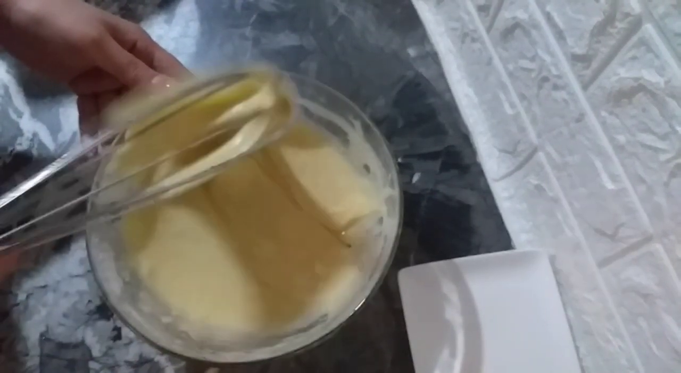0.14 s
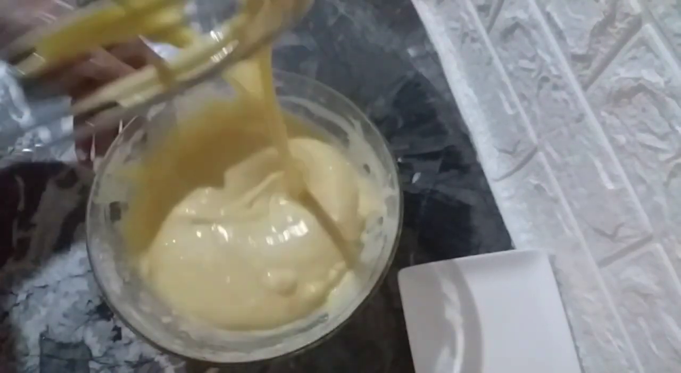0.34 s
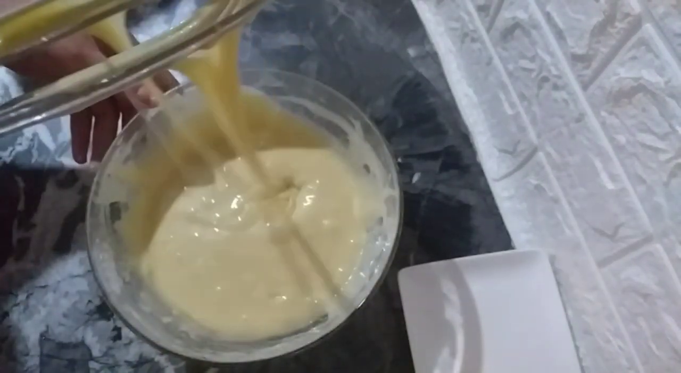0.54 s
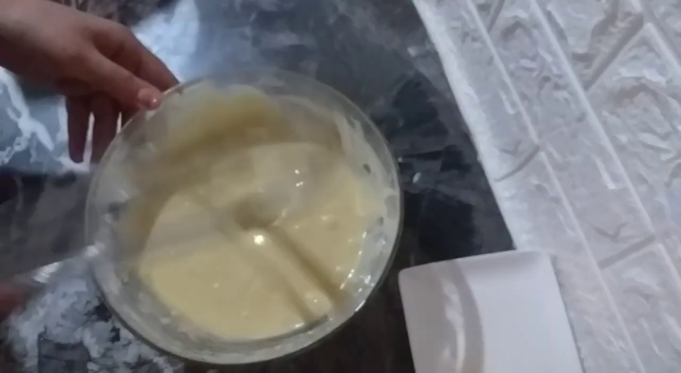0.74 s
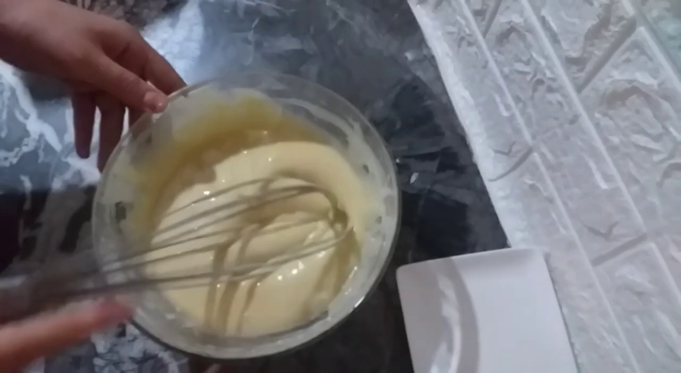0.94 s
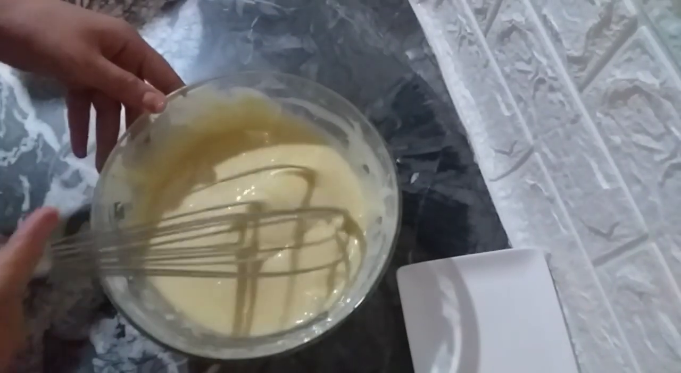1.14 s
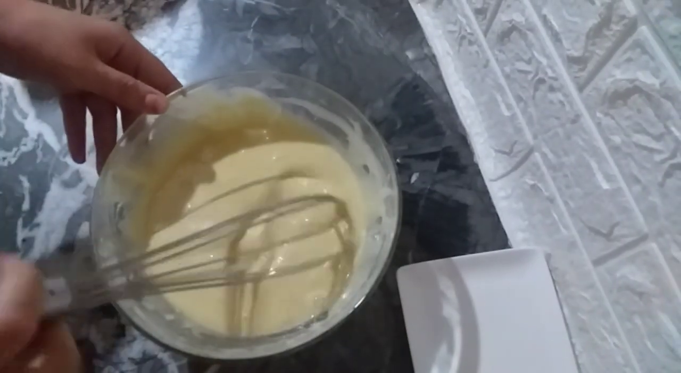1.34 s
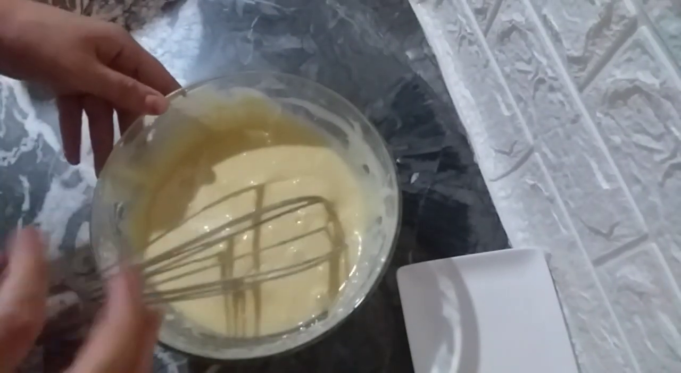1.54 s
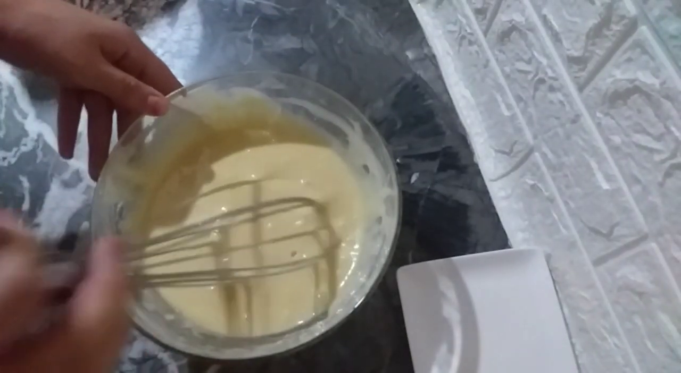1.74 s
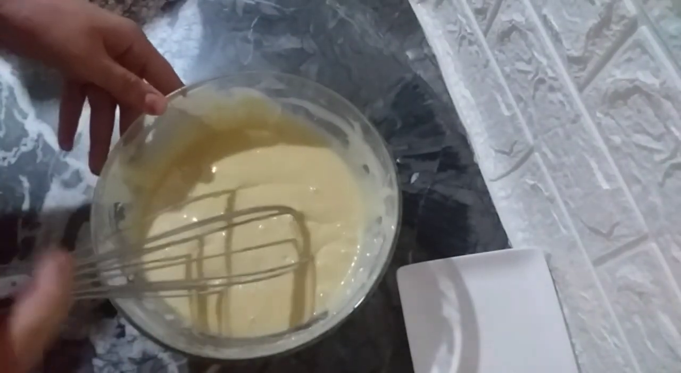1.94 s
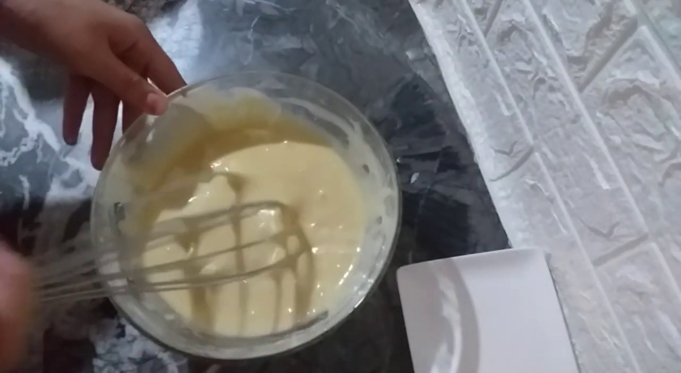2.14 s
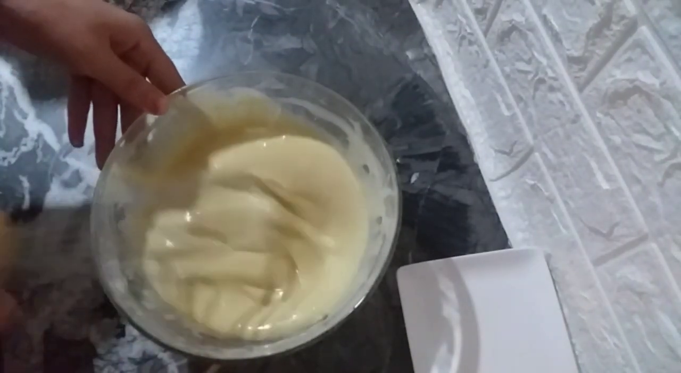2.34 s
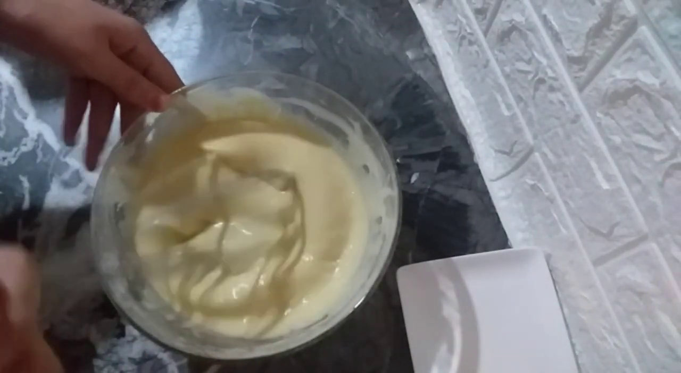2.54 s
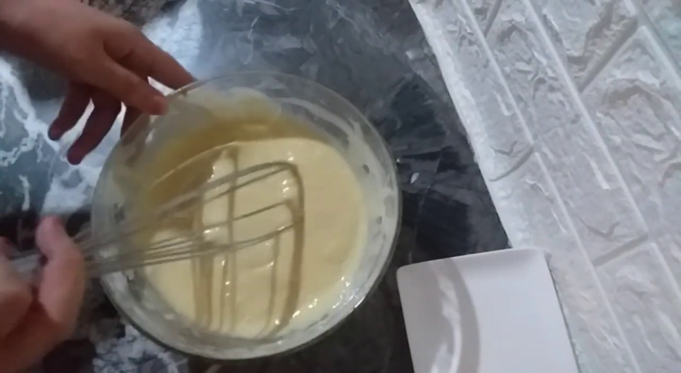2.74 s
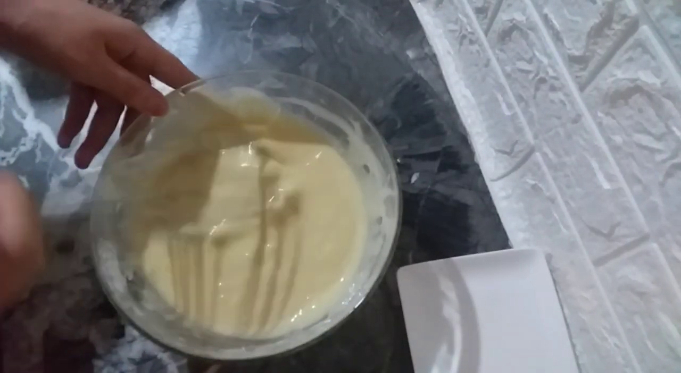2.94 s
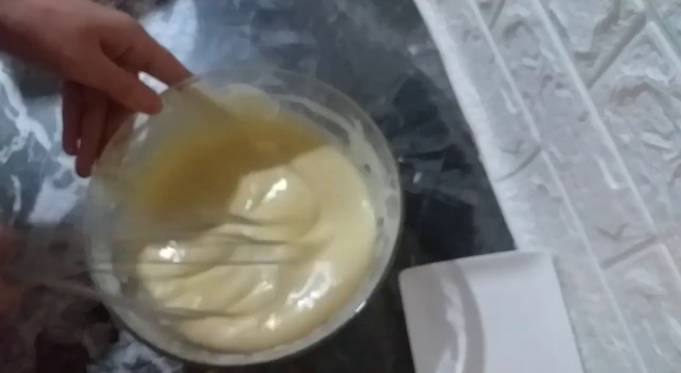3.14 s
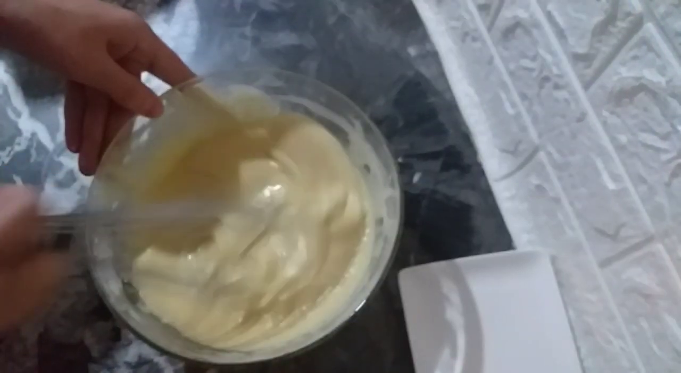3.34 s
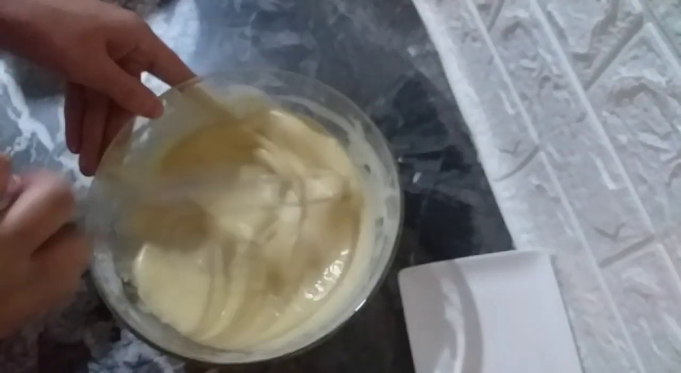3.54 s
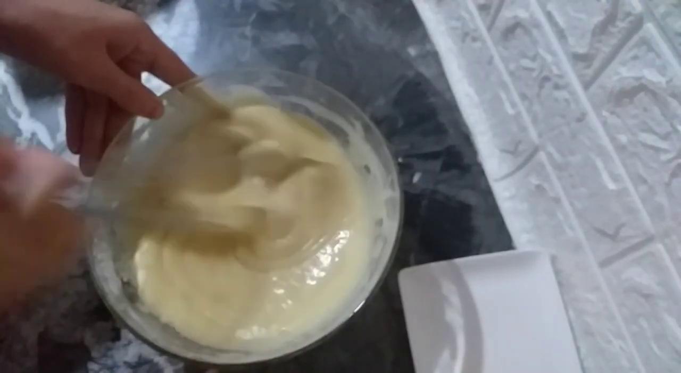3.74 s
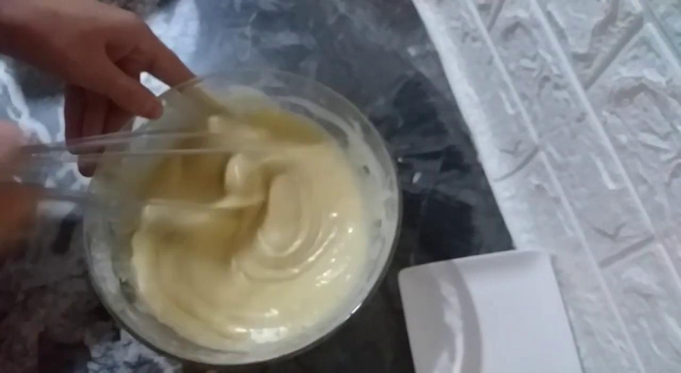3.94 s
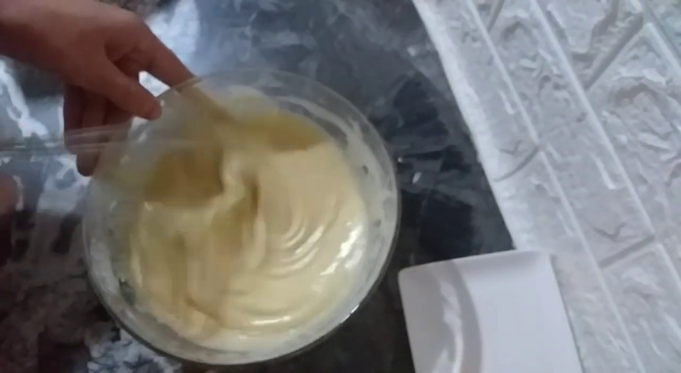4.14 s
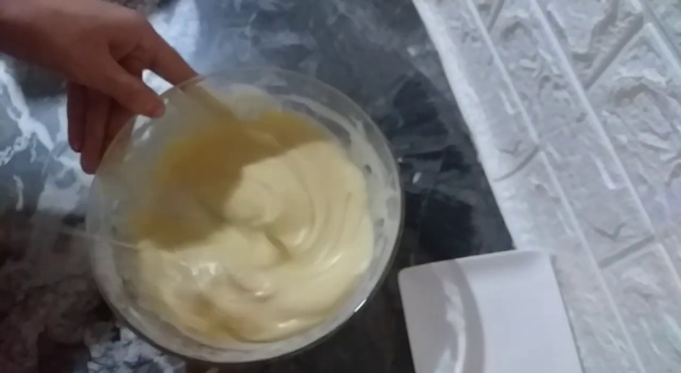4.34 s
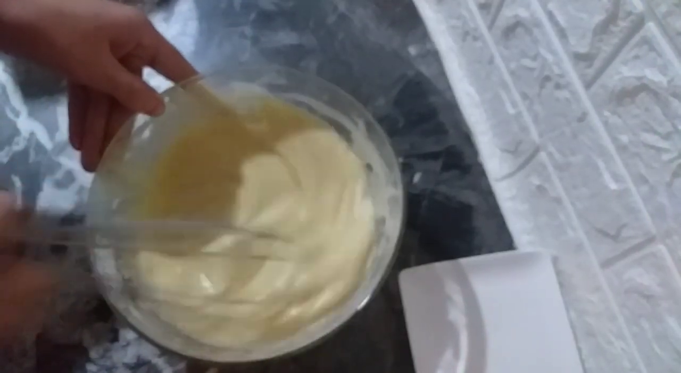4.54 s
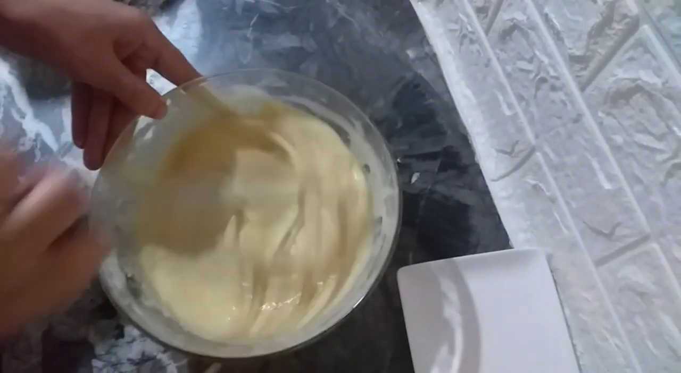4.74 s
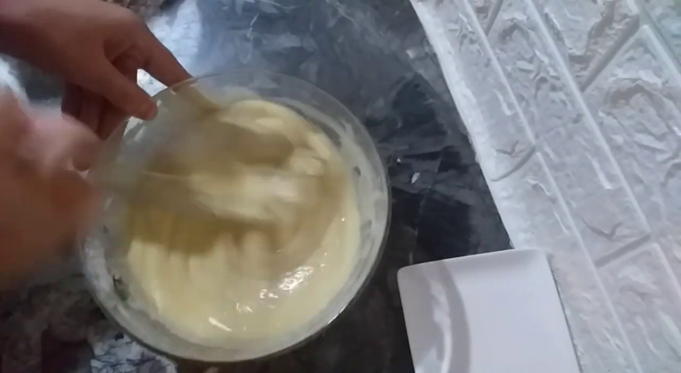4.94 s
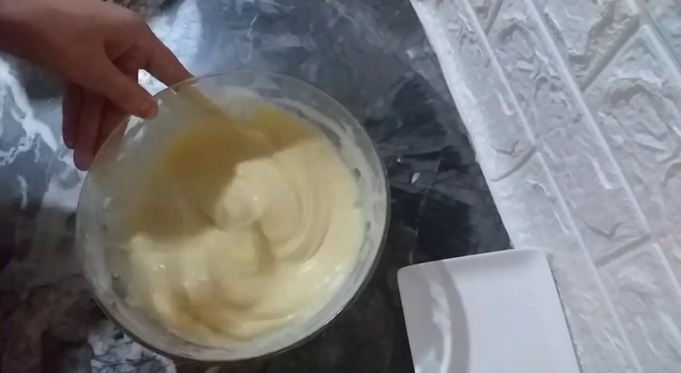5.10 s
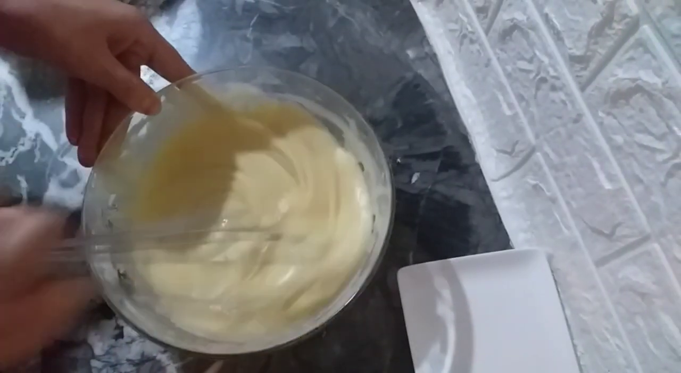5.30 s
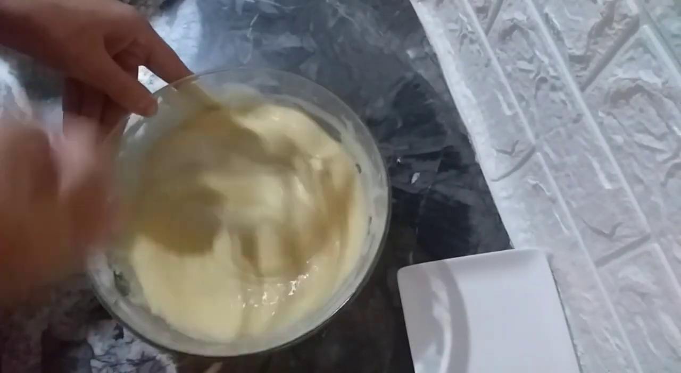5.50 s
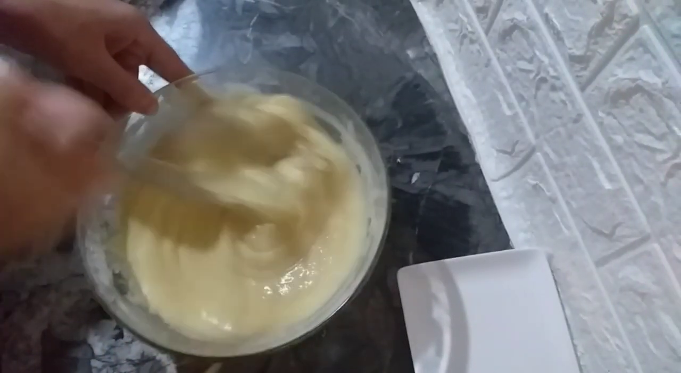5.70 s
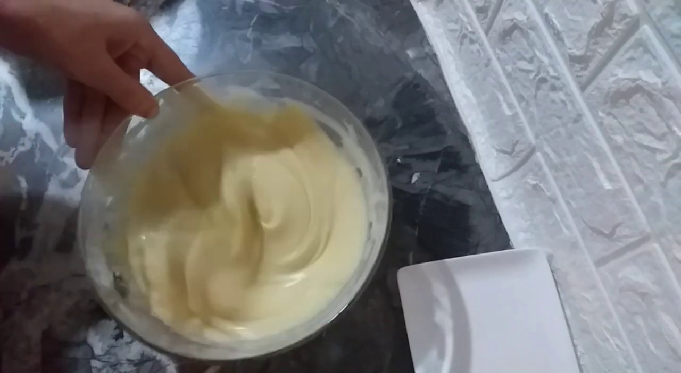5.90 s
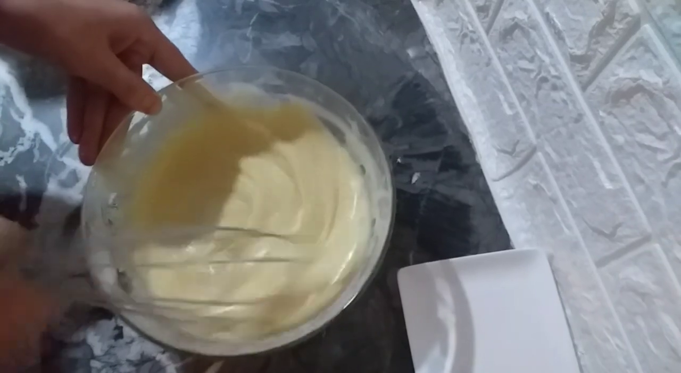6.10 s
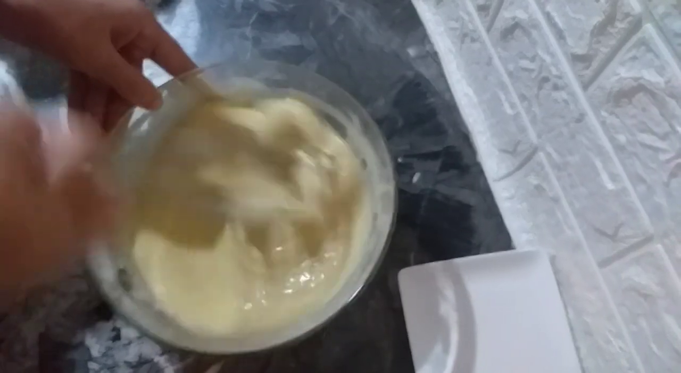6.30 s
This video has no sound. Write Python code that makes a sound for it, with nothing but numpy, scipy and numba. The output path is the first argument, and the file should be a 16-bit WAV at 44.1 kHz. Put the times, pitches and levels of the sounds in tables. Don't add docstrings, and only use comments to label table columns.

```python
import sys
import numpy as np
from scipy import signal
from scipy.fft import rfft, irfft
from scipy.io import wavfile
from scipy.ndimage import uniform_filter1d
from numba import njit

SR = 44100
rng = np.random.default_rng(int(sys.argv[2]) if len(sys.argv) > 2 else 0)


def undo_db(level):
    steps = np.asarray(level, float) / 20
    return 10 ** steps


def wrap_up_sound(samples):
    columns = np.atleast_2d(samples).T
    tamed = np.clip(columns, -1, 1)
    steps = np.round(tamed * 32767).astype(np.int16)
    wavfile.write(sys.argv[1], SR, steps)


N = 280476

# start_s, level_db
HUM_SWELL = [(0, -54.5), (1.0, -56.5), (1.2, -48), (2.4, -48), (6.36, -47)]
# start_s, level_db
TAPS = [
    (2.3, -20),
    (2.531, -17),
    (3.027, -40),
    (3.283, -39),
]
# start_s, peak_db, wire_ring_hz, dull_knock_db, flurry_ms
STRIKES = [(2.3001, -9.5, 6570, -21, 1.9), (2.3068, -16.5, 7850, -13, 14.5),
           (2.531, -2.5, 7670, -17.5, 1.55), (3.3974, -29, 4200, -8, 27), (3.8685, -15, 7200, -13.5, 4.7),
           (4.131, -14, 6400, -10, 4.7), (4.3334, -15.5, 5600, -29, 7), (4.376, -16, 7440, -9.5, 2.9),
           (4.58, -15.5, 5300, -20, 3.8), (4.6257, -14.5, 7400, -15, 7.4), (4.88, -16, 7050, -16.5, 5.8),
           (5.1349, -13.5, 7630, -15, 6.1), (5.1739, -17.5, 8000, -11, 3.5), (5.367, -15.5, 7700, -25, 8.8),
           (5.4034, -12, 7560, -15.5, 6.5), (5.453, -17.5, 7700, -9, 5.6), (5.5394, -19.5, 8000, -9.5, 3.4),
           (5.674, -5.5, 7700, -22.5, 5), (5.7095, -15.5, 7900, -10.5, 5.6),
           (5.7981, -18.5, 7640, -9.5, 7.8), (5.9047, -12.5, 5540, -18, 3.5),
           (6.072, -12.5, 8000, -11.5, 2.6), (6.2133, -21, 8200, -12.5, 18),
           (6.253, -11.5, 7700, -10.5, 4.4)]
# pitch_hz, level_db, t60_s
GLASS = [(1363, -1, 0.03), (2099, 4, 0.048), (3052, 7, 0.062), (4140, 6.5, 0.044), (5504, 11.5, 0.052),
         (6040, -3, 0.04), (7680, 6.5, 0.048), (7030, 2, 0.04), (3820, -1, 0.042), (8600, 10, 0.047),
         (15300, 3, 0.024), (11840, 10, 0.019), (12250, 5, 0.04), (14370, -1, 0.03)]


def unit(x):
    return x / np.sqrt(np.mean(x ** 2))


def curves(table):
    s, *columns = np.transpose(table)
    return [np.interp(np.arange(N) / SR, s, c) for c in columns]


@njit
def svf(x, hz, width):
    y, b, l = np.empty(len(x)), 0., 0.
    for i in range(len(x)):
        centre = hz[i % len(hz)]
        g, k = np.tan(np.pi * centre / SR), width / centre
        v = (b + g * (x[i] - l)) / (1 + g * (g + k))
        b, l, y[i] = 2 * v - b, l + 2 * g * v, k * v
    return y


def band(x, hz, width):
    return svf(x + 1e-18, np.array([1. * hz]), 1. * width)


def narrow_noise(hz, width):
    return unit(band(band(rng.standard_normal(N), hz, width), hz, width))


def walk(rate):
    k = int(SR / rate)
    steps = np.repeat(rng.standard_normal(N // k + 1), k)
    return uniform_filter1d(uniform_filter1d(steps, k), k)[:N]


def add(out, s, x):
    i = int(s * SR)
    out[..., i:i + x.shape[-1]] += x[..., :max(N - i, 0)]


def fridge(wobble_db=1.4, wobble_hz=9):
    # pitch_hz, level_db
    hum = [
        (48.4, -59),
        (96.9, -50.5),
        (145.3, -75.5),
    ]
    # centre_hz, width_hz, level_db
    vent_bands = [(2475, 330, -68.5), (3450, 240, -72), (5000, 600, -65), (7700, 450, -71),
                  (13500, 4500, -80), (1940, 360, -78)]
    t, (swell_db,) = np.arange(N) / SR, curves(HUM_SWELL)
    tones = np.zeros(N)
    for k, (hz, db) in enumerate(hum):
        wobble = wobble_db * (k + 0.35) * narrow_noise(wobble_hz, wobble_hz)
        tones += undo_db(db + wobble) * np.sin(2 * np.pi * hz * t)
    vent = sum(undo_db(db) * unit(band(rng.standard_normal(N), hz, width)) for hz, width, db in vent_bands)
    drone = undo_db(-9) * narrow_noise(315, 25)
    return (unit(tones) + drone * undo_db(swell_db - swell_db[-1])) * undo_db(swell_db) + vent


def rustle(flicker_db=4.0, flicker_rate=18):
    edges_hz = [130, 700, 1550, 8500]
    # pitch_hz, level_db_per_hz
    rustle_colour = [(71, -37), (120, -10), (174, -13), (310, -6.5), (624, -17.5), (1160, -22), (1680, -26),
                     (3900, -31.5), (5100, -29.5), (15200, -43), (16500, -38)]
    # start_s, level_db
    movement = [(0, 12), (.04, 2), (.4, -6.5), (.5, 1), (.98, -3), (1.05, -2), (1.13, 4), (1.28, 3.5),
                (1.37, 5.5), (1.55, 3), (1.75, 0), (2.2, 1.1), (2.42, -0.5), (2.7, 1.5), (2.99, -3.5),
                (3.3, 4.5), (3.63, 4), (6.36, -2.5)]
    # rest_db, db_per_db_of_movement, db_per_db_of_phone_gain, beating_db
    layers = [
        (-54.5, 0.99, 1, -1),
        (-68.5, 2.5, 0.86, -6),
        (-59.5, 1.85, 1, -9),
        (-66.5, 0.84, 0.37, 5.5),
    ]
    # centre_s, half_length_s, added_air_db
    swishes = [
        (1.107, 0.068, 10),
        (1.37, 0.026, 13.5),
        (1.977, 0.023, 8),
    ]
    t = np.arange(N) / SR
    hz, colour = np.transpose(rustle_colour)
    region = np.zeros((4, N))
    for f in np.geomspace(131, 15300, 25):
        db = np.interp(np.log(f), np.log(hz), colour) + 10 * np.log10(f)
        flicker = flicker_db * walk(flicker_rate)
        region[np.searchsorted(edges_hz, f + 1) - 1] += undo_db(db + flicker) * narrow_noise(f, f / 3.4)
    region = [unit(r) for r in region]
    region[-1] *= undo_db(sum(db * np.exp(-((t - s) / half) ** 2) for s, half, db in swishes))
    (move_db,), (gain_db,) = curves(movement), curves(HUM_SWELL)
    beating = np.clip((t - 2.96) / 1, 0, 1)
    out = np.zeros(N)
    for (rest_db, per_move, per_gain, beating_db), r in zip(layers, region):
        db = rest_db + per_move * move_db + per_gain * (gain_db - gain_db[-1]) + beating_db * beating
        out += undo_db(db) * r
    return out


def thuds(spread=0.17, partner_db=-5, rise_s=0.0096, cycles=19):
    # start_s, peak_db,
    # pitch_hz
    bowl_thuds = [(2.44, -57, 310), (2.91, -56, 260), (2.765, -39, 300), (3.024, -34.5, 393),
                  (3.279, -34.5, 361), (3.482, -29.5, 310), (3.523, -31, 280), (3.573, -36, 369),
                  (3.733, -32.5, 323), (3.985, -29.5, 354), (4.186, -26.5, 320), (4.249, -28, 316),
                  (4.326, -35, 377), (4.437, -29, 296), (4.508, -27, 354), (4.668, -29.5, 316),
                  (4.753, -33, 380), (4.999, -30.5, 321), (5.179, -32.5, 318), (5.261, -31.5, 314),
                  (5.45, -35.5, 258), (5.538, -27, 390), (5.739, -33, 313), (5.8, -31.5, 344),
                  (5.939, -32.5, 262), (5.988, -31, 283), (6.037, -41, 266), (6.077, -26.5, 391),
                  (6.253, -34.5, 284), (6.301, -36.5, 247),
                  (0, -45, 129),
        (0, -63, 270),
                  (3.231, -38.5, 324), (4.144, -47, 258), (3.348, -59, 307), (3.657, -45, 220),
             (3.695, -35, 420), (3.758, -36, 228), (3.809, -36, 369), (3.928, -38, 273), (3.965, -36, 229),
             (4.012, -49, 416), (4.1, -40, 230), (4.363, -41.5, 213), (4.623, -37, 383), (4.778, -41, 331),
             (4.88, -48, 353), (4.944, -37.5, 241), (5.136, -42, 215), (5.208, -39, 244), (5.296, -47, 295),
             (5.371, -39, 377), (5.562, -39.5, 310), (6.1, -32, 424), (6.212, -35.5, 227),
             (6.344, -31, 388)]
    out, t = np.zeros(N), np.arange(8192) / SR
    rows = bowl_thuds
    rows += [(s, db - 29.5, 217.8) for s, db, *_ in STRIKES]
    rows += [(s, db - 6.5, 205) for s, db in TAPS[2:]]
    for (s, db, hz), c in zip(rows, rng.uniform(-0.97, 1, size=(len(rows), 4))):
        above_hz, below_hz = hz * (1.305 + spread * c[0]), hz * (0.737 + spread * c[2])
        wave = np.sin(2 * np.pi * hz * t)
        wave += undo_db(partner_db - 3.5) * np.sin(2 * np.pi * above_hz * t + np.pi * c[1])
        wave += undo_db(partner_db) * np.sin(2 * np.pi * below_hz * t + np.pi * c[3])
        add(out, s, undo_db(db + 11.5) * wave * (1 - np.exp(-t / rise_s)) * 1000 ** (-t * hz / cycles))
    return out


def contacts():
    # start_s, peak_db, wire_ring_hz, dull_knock_db
    bare = [(6.148, -44, 8800, -30), (2.4982, -40, 4340, -28), (3.0934, -39, 7060, -6),
            (3.1396, -38, 6760, -47), (3.5734, -33, 7700, -8), (3.7489, -28, 6750, -2.5),
            (4.0974, -27, 7050, -3.5), (4.1445, -22, 4120, -7), (5.008, -26.5, 7100, -8.5),
            (5.1973, -26.5, 7700, -4), (6.0828, -18.5, 8200, -19), (6.342, -22, 7700, -8),
            (6.352, -22.5, 7000, -6)]
    # start_s, peak_db, wire_ring_hz, dull_knock_db
    filmed = [(2.268, -41, 6400, -22), (3.1953, -31, 6650, -29), (3.3904, -22, 5500, -20),
              (3.5115, -29, 6700, 1.5), (3.7324, -33.5, 3770, 2.5), (3.8, -32, 7020, -5),
              (3.9161, -26.5, 6700, -6), (3.9619, -35.5, 5640, 5.5), (3.9832, -22.5, 6040, -8.5),
              (4.1826, -21.5, 8150, -7.5), (4.2094, -27.5, 7700, -22), (4.324, -37.5, 5500, -3),
              (4.4263, -18.5, 5500, -6), (4.4325, -21.5, 6700, -10), (5.228, -25, 6400, -12),
              (5.2674, -22.5, 7760, -5), (5.4869, -26.5, 6840, -12.5), (5.55, -24, 7800, -8),
              (5.7657, -25, 7700, -10), (5.9421, -17.5, 7440, -7.5), (5.9644, -26, 5860, -32),
              (5.9822, -21.5, 7500, -4), (6.0403, -30.5, 6100, -31)]
    # start_s, peak_db, wire_ring_hz, dull_knock_db
    buried = [(3.0268, -36.5, 3800, -1), (3.23, -28.5, 3960, -8), (3.2635, -31.5, 6640, -3),
              (3.2824, -37, 3520, 1), (3.455, -29, 6800, -8), (3.651, -32, 4100, -2.5),
              (3.6939, -27.5, 7100, -7), (3.8227, -37.5, 6400, -3), (4.2499, -29, 6070, -4),
              (4.5087, -32, 8700, 2), (4.6673, -21.5, 7430, -6), (4.7263, -31, 6000, -6.5),
              (4.757, -28, 7000, -4), (4.9192, -25.5, 7540, -8), (4.9362, -34, 7900, -0.5),
              (4.9983, -30.5, 6300, -5), (5.2104, -33, 6470, -1), (5.2604, -23, 4860, -18),
              (5.2944, -30.5, 4370, -4), (5.7036, -18, 5190, -16), (5.8324, -35.5, 6500, 7.5),
              (6.097, -31.5, 6500, 4), (6.1762, -29.5, 7600, -2), (6.3111, -28, 7950, -5.5)]
    # start_s, peak_db, wire_ring_hz, dull_knock_db
    drips = [(0.299, -40.5, 7200, -45), (0.3612, -41, 5000, -31), (0.394, -48, 6500, -24),
             (0.432, -40.5, 4600, -12), (0.489, -41.5, 4740, -29), (0.7744, -42, 7700, -13),
             (0.869, -48, 7500, -30), (0.784, -35, 3980, -12.5), (1.225, -39, 7300, -3),
             (1.347, -33.5, 4700, -16), (1.647, -43, 4220, -31), (1.957, -44, 5210, -24)]
    rows = []
    for s, db, hz, knock_db, ms in STRIKES:
        top_db = -9 - 0.32 * knock_db - 3 * (hz / 1000 - 6.5)
        rows.append((s, db, hz, knock_db, top_db, ms))
    for table, top_db in (bare, -4.5), (filmed, -8.5), (buried, -19):
        rows += [(*row, top_db, 5.44 + 0.18 * (row[1] + 22)) for row in table]
    return rows + [(*row, -9, 2.2) for row in drips]


def grazes():
    # start_s, peak_db, wire_ring_hz, dull_knock_db
    graze_rows = [(2.271, -36.5, 6000, -18), (2.484, -45, 7000, -30), (3.013, -48, 4000, 6),
                  (3.063, -42, 6530, -5), (3.113, -39, 7000, -14), (3.176, -33, 8000, -32),
                  (3.219, -36, 7500, -10), (3.404, -29.5, 4000, -4), (3.48, -43.5, 6000, 9.5),
                  (3.521, -33.5, 5970, -0.5), (3.593, -42.5, 6000, -1), (3.689, -37, 6500, -7),
                  (3.719, -42, 6500, 6), (0.345, -54, 4500, -30), (3.944, -42, 7000, 6),
                  (3.967, -35, 6950, -21), (3.978, -32, 7460, -19), (4.178, -36, 7000, -9),
                  (4.488, -41, 7000, -12), (4.528, -45, 6400, -9), (4.776, -39, 6300, -4),
                  (4.959, -35.5, 7600, -3), (5.364, -28, 7500, -13), (5.402, -32, 7500, -8),
                  (5.545, -24.5, 7000, -5.5), (5.567, -35, 6440, -14), (5.743, -37, 7000, 7),
                  (5.761, -38, 7500, -15), (0.592, -55, 8500, -35), (6.03, -37.5, 7500, 1),
                  (6.044, -37, 6550, -10), (6.209, -24, 8000, -13), (6.301, -37, 7500, -15),
                  (2.5323, -20, 8600, -13), (4.3367, -14, 6950, -10), (5.1758, -21.5, 7700, -6.5),
                  (5.3686, -9, 7700, -34), (5.407, -16, 7600, -10), (6.2145, -14.5, 8700, -11.5)]
    return [(*row, -7.5, 3.9) for row in graze_rows]


def coloured(shape, lo_hz, hi_hz, ragged_db):
    # pitch_hz, level_db_per_hz
    blow_colour = [(240, 13), (400, 2.5), (581, -8), (818, -13.5), (1870, -7), (2180, -5), (3270, -7),
                   (4330, -6), (5910, -5.5), (7350, -2.5), (9130, -1), (15300, -11), (16500, -53)]
    f = np.fft.rfftfreq(shape[-1], 1 / SR) + 1
    hz, db = np.transpose(blow_colour)
    humps = np.repeat(rng.standard_normal((shape[0], len(f) // 40 + 1)), 40, axis=1)
    humps = uniform_filter1d(humps, size=40)[:, :len(f)]
    gain = undo_db(np.interp(np.log(f), np.log(hz), db) + ragged_db * humps)
    gain /= (1 + (lo_hz / f) ** 6) * (1 + (f / hi_hz) ** 8)
    rows = irfft(rfft(rng.standard_normal(shape)) * gain)
    return rows / rows.std(axis=1, keepdims=True)


def loaded_bowl(x):
    # pitch_hz, width_hz, level_db
    knock_modes = [(859, 110, 5), (1340, 194, 6), (1485, 126, 1), (2354, 590, 1)]

    def ring(v):
        return sum((-1) ** k * undo_db(db) * band(v, hz, width) for k, (hz, width, db) in enumerate(knock_modes))
    return ring(x) / np.sqrt(np.sum(ring(signal.unit_impulse(4096)) ** 2))


def whisk(rows, scatter_db=3, chatter_db=-14, chatter_s=0.016, rise_s=0.00056, knock_slower=2.06,
          ring_width_hz=350):
    t, shape = np.arange(4096) / SR, (len(rows), 4096)
    wire = coloured(shape, 2800, 9000, 2.5)
    knock = coloured(shape, 450, 2800, 3)
    tick = coloured(shape, 9000, 17000, 3)
    clumps = np.clip(rng.standard_normal((len(rows), 128)), -2, 1.5)
    clumps = undo_db(scatter_db * np.repeat(clumps, 32, axis=1))
    snap = undo_db(-0.5) * np.exp(-t / 0.00036)
    out, bowl, drag = np.zeros((3, N))
    for k, (s, db, hz, knock_db, tick_db, ms) in enumerate(rows):
        def shake(slower):
            flurry = np.exp(-t / (slower * ms / 1000))
            chatter = undo_db(chatter_db) * np.exp(-t / (slower * chatter_s))
            return undo_db(db) * (1 - np.exp(-t / rise_s)) * clumps[k] * (flurry + chatter + snap)
        force = shake(0.79) * wire[k]
        add(bowl, s, undo_db(knock_db) * shake(knock_slower) * knock[k])
        add(out, s, undo_db(-5.5) * force + undo_db(-0.5) * band(force, hz, ring_width_hz))
        add(out, s, undo_db(tick_db - 1.5) * shake(0.52) * tick[k])
        add(drag, s, undo_db(0.67 * db) * np.exp(-t / 0.031) * (1 - t / t[-1]))
    blows = out + undo_db(-6.5) * bowl + undo_db(-13.5) * loaded_bowl(bowl)
    return blows, drag * (np.arange(N) > 3.1 * SR)


def sparrows(fade_s=0.0052, buzz_hz=900, hiss_width_hz=1500, most_sag_hz=900):
    # top_s, rise_s, fall_s, level_db, top_hz
    scolds = [
        (.905, 0.025, 0.073, -52.5, 4830),
        (1, .02, 0.017, -66, 5100),
        (.9, 0.014, 0.049, -61.5, 3600),
    ]
    # top_s, rise_s, fall_s, level_db, top_hz
    chirps = [
        (1.104, 0.078, 0.12, -61, 3840),
        (1.47, 0.048, 0.076, -60, 3936),
        (1.6, 0.012, 0.046, -51.5, 4190),
        (1.635, 0.016, 0.035, -52.5, 3890),
        (2.821, 0.072, 0.13, -70, 3450),
    ]
    out, t = np.zeros(N), np.arange(N) / SR
    buzz, noise = unit(band(rng.standard_normal(N), 184, 260)), rng.standard_normal(N)
    calls = [(c, 0.228) for c in chirps] + [(c, 0.46) for c in scolds]
    for (s, rise, fall, top_db, top_hz), harsh in calls:
        hz = top_hz - np.minimum(350000 * (1 - harsh) * (t - s) ** 2, most_sag_hz)
        db = top_db - 26.5 * np.minimum(((t - s) / np.where(t < s, rise, fall)) ** 2, 1)
        gate = np.clip(np.minimum(t - s + rise, s + fall - t) / fade_s, 0, 1)
        tone = np.sqrt(2) * np.sin(2 * np.pi * np.cumsum(hz + harsh * buzz_hz * buzz) / SR)
        spread_hz = hiss_width_hz * (0.5 + 8.2 * harsh ** 2)
        hiss = unit(svf(svf(noise, hz, spread_hz), hz, spread_hz))
        out += gate * undo_db(db) * ((1 - harsh) * tone + harsh * hiss)
    return out


def dove():
    # start_s, length_s, pitch_hz, level_db
    hoots = [
        (1.838, 0.076, 615, -49.5),
        (2.121, 0.12, 575, -55.5),
    ]
    out = np.zeros(N)
    for s, length, hz, db in hoots:
        t = np.arange(int(length * SR)) / SR
        add(out, s, undo_db(db) * np.sin(np.pi * t / length) * np.sin(2 * np.pi * hz * t))
    return out


def rasp(drag, rate=4000, size_db=1.0, patchy_db=3.0, shimmer_db=12.5, sing_width_hz=350, wander=0.11):
    # start_s, length_s, level_db, singing_wire_hz
    slides = [(2.256, 0.025, -56, 6500), (2.386, 0.063, -54, 7350), (2.502, 0.092, -50.5, 6460),
              (3.04, 0.084, -59.5, 6600), (3.13, 0.037, -51.5, 5740), (3.192, 0.024, -54, 7400),
              (3.244, 0.056, -51, 6350), (3.305, 0.058, -50.5, 6860), (3.462, 0.069, -53, 6550),
              (3.503, 0.038, -52, 6100), (3.7, 0.064, -50, 6500), (3.78, 0.074, -62, 6000),
              (3.926, 0.057, -53, 7100), (3.962, 0.1, -57.5, 7500), (4.16, 0.033, -51, 7000),
              (4.437, 0.027, -67, 6950), (4.5, 0.034, -57, 7000), (4.758, 0.035, -63, 6500),
              (4.934, 0.023, -73, 7500), (5.325, 0.11, -52, 5000), (5.416, 0.017, -43, 7000),
              (5.546, 0.072, -58, 6850), (5.72, 0.047, -52, 7500), (5.99, 0.041, -59, 7700),
              (6.1, 0.12, -68, 6630), (6.27, 0.056, -55, 7800)]
    t = np.arange(N) / SR
    sizes = undo_db(size_db * np.minimum(rng.exponential(size=N), 2.5))
    ticks = (rng.random(N) < rate / SR) * sizes * rng.standard_normal(N)
    skid = band(ticks, 1300, 1400) + undo_db(1.5) * band(ticks, 4440, 3500) + undo_db(2) * band(ticks, 7200, 1200)
    shimmer = sum(undo_db(shimmer_db * walk(35)) * band(ticks, hz, 150) for hz, *_ in GLASS[2:10])
    skid = unit(unit(skid) + undo_db(-10.5) * unit(shimmer))
    patches = undo_db(patchy_db * walk(45))
    starts, _, _, sing_hz = np.transpose(slides)
    hz = sing_hz[np.maximum(np.searchsorted(starts, t) - 1, 0)] * (1 + wander * walk(60))
    sing = undo_db(-5) * unit(svf(ticks, hz, 1. * sing_width_hz))
    slide, u = np.zeros(N), t[:8192]
    for s, length, db, _ in slides:
        add(slide, s, undo_db(db) * (1 - np.exp(-u / 0.005)) * np.exp(-np.maximum(u - length, 0) / 0.014))
    dragging = uniform_filter1d(1. * (t > 4.345) * (t < 4.345 + 0.085), size=512)
    scrape = undo_db(-38.5) * dragging * unit(band(ticks, 5500, 1400))
    skidding = undo_db(-34) * drag + undo_db(-59.5) * (t > 2.96)
    return scrape + patches * (skidding * skid + slide * (skid + sing))


def handle(rise_s=0.0022, free_s=0.047, caught_s=0.013):
    # pitch_hz, level_db, t60_s
    first_tap = [(206, -3, 0.13), (310, 0.5, 0.071), (361, -2, 0.13), (777, -1.5, 0.12), (1130, -12, 0.095),
                 (1278, 3.5, 0.024), (1340, 0, 0.033), (2110, -3, 0.051), (2226, -2.5, 0.055),
                 (2740, -12.5, 0.1), (2960, -13, 0.13)]
    # pitch_hz, level_db, t60_s
    second_tap = [(177, 1.5, 0.059), (330.3, 0, 0.23), (408, -4.5, 0.094), (814, -15, 0.12),
                  (1455, -17, 0.072), (1940, -3, 0.04), (2310, -11.5, 0.068), (2654, -11, 0.09),
                  (3800, -6, 0.081), (4210, -6, 0.062), (5000, -6, 0.041)]
    # pitch_hz, level_db, t60_s
    handle_modes = [(796, 9.5, 0.033), (1260, -1.5, 0.041), (2160, -18, 0.049), (3620, -14, 0.085)]
    out, t = np.zeros(N), np.arange(8192) / SR
    for (s, db), modes in zip(TAPS, [first_tap, second_tap, handle_modes, handle_modes]):
        hz, mode_db, t60 = np.transpose(modes)[:, :, None]
        bounce = 1 + 4 * uniform_filter1d(rng.standard_normal((len(modes), len(t))), size=256)
        ring = bounce * undo_db(mode_db) * np.sin(2 * np.pi * hz * t) * 1000 ** (-t / np.minimum(t60, 0.2))
        stilled = np.exp(-np.maximum(t - free_s, 0) / caught_s)
        add(out, s, undo_db(db) * (1 - np.exp(-t / rise_s)) * stilled * ring.sum(axis=0))
    return out


def glass(scatter_db=0.5, detune=0.0024, rise_s=0.0015):
    # start_s, peak_db, brightness_db_per_octave, third_mode_db, ring_length_factor
    rim_strikes = [(3.16, -58, 1.5, -4, 1.7), (3.3943, -39, 1, -8, 0.7), (3.402, -33.5, -4, -5, 0.72),
                   (3.916, -50, -12, 5, 0.74), (4.433, -41, -9, 11, 0.27), (3.655, -54, -7, 6, 1.03),
                   (3.8704, -31.5, 1.5, 0, 0.53), (4.1, -47, -9.5, -3, 1.1), (4.134, -62, -4, 0.1, .9),
                   (4.3334, -25, -1, -0.5, 0.71), (4.5821, -28, 2, 0.5, 0.54), (4.88, -46.5, 4, 4, 0.75),
                   (5.3698, -30.5, -3.5, 3.5, 0.53), (5.9067, -27.5, 2.5, 0.8, 0.67),
                   (6.1755, -40.5, -6, -16, 1.3)]
    out, t = np.zeros(N), np.arange(4096) / SR
    hz, mode_db, t60 = np.transpose(GLASS)[:, :, None]
    for s, db, bright_db, third_db, longer in rim_strikes:
        c = rng.standard_normal((3, len(GLASS), 1))
        flutter = 1 + 1.6 * uniform_filter1d(rng.standard_normal((len(GLASS), len(t))), size=64)
        gain = undo_db(db + mode_db + bright_db * np.log2(hz / 3050) + scatter_db * c[0])
        gain[2] *= undo_db(third_db)
        tones = np.sin(2 * np.pi * (hz * (1 + detune * c[1]) * t + c[2]))
        modes = gain * tones * 1000 ** (-t / (longer * t60))
        add(out, s, undo_db(4.5) * (1 - np.exp(-t / rise_s)) * (flutter * modes).sum(axis=0))
    return out


def wires(t60_s=0.089):
    # start_s, peak_db, pitch_hz
    wire_rings = [
        (6.254, -21, 7950),
        (5.711, -37, 5300),
    ]
    out, t = np.zeros(N), np.arange(8192) / SR
    for s, db, hz in wire_rings:
        add(out, s, undo_db(db) * np.sin(2 * np.pi * hz * t) * 1000 ** (-t / t60_s))
    return out


@njit
def walls(x, lags, gain, damp):
    line, soft, out = np.zeros((8, 4096)), np.zeros(8), np.zeros(len(x))
    for i in range(len(x)):
        total = 0.
        for k in range(8):
            soft[k] += (1 - damp) * (gain[k] * line[k, (i - lags[k]) & 4095] - soft[k])
            total += soft[k]
        out[i] = soft[0] - soft[3] + soft[5] - soft[6]
        for k in range(8):
            line[k, i & 4095] = x[i] + soft[k] - total / 4
    return out


def scene(room_t60_s=0.21, room_damp=0.51, room_db=-15.5):
    steady_top = signal.ellip(8, .3, 50, 15800, fs=SR, output="sos")
    steady = signal.sosfilt(steady_top, fridge() + rustle())
    blows, drag = whisk(contacts())
    graze, _ = whisk(grazes())
    birds = sparrows()
    near = thuds() + blows + graze + rasp(drag) + handle() + glass() + wires()
    lags = np.array([331, 457, 613, 797, 971, 1163, 1399, 1607])
    room = walls(near + undo_db(25.5) * birds, lags, undo_db(-60 * lags / SR / room_t60_s), room_damp)
    mono = near + undo_db(12.0) * birds + undo_db(room_db) * room + steady + dove()
    return np.array([mono, mono])


def band_limit(x):
    return signal.sosfilt(signal.butter(12, 15900, fs=SR, output="sos"), x)


def record(dry, grit_db=-13, grit_hz=5000, grit_from_db=-45):
    dry = dry - 0.56 * band(dry[0], 9420, 4400)
    top_cut = signal.ellip(5, .3, 30, 16300, fs=SR, output="sos")
    x = signal.sosfilt(top_cut, np.tanh(1.128 * dry) / 1.538)
    high = signal.butter(4, grit_hz, "high", fs=SR, output="sos")
    grit = signal.sosfilt(high, signal.sosfilt(high, x[0]) * unit(band(rng.standard_normal(N), 660, 400)))
    loud = uniform_filter1d(x[0] ** 2, size=1024)
    grit = grit * loud / (loud + undo_db(2 * grit_from_db))
    return band_limit(x + undo_db(grit_db) * grit * np.array([[1], [-1]]))


dry = scene()
out = record(dry)
wrap_up_sound(out)
```